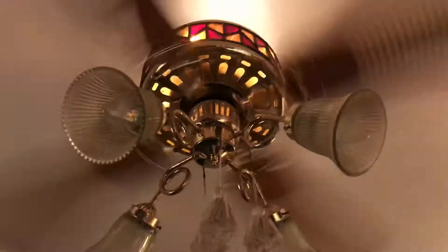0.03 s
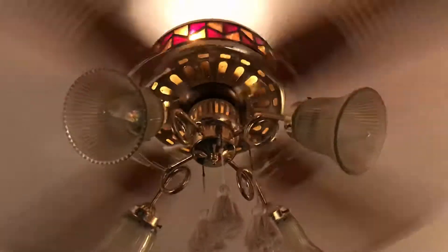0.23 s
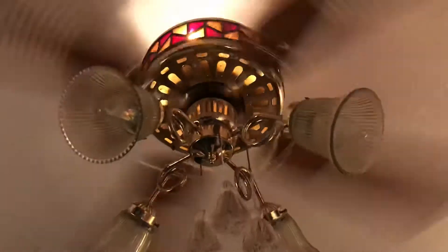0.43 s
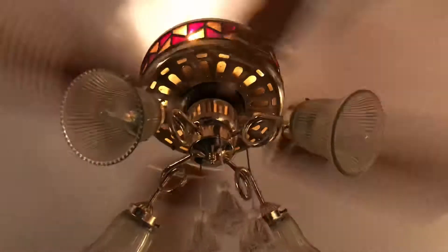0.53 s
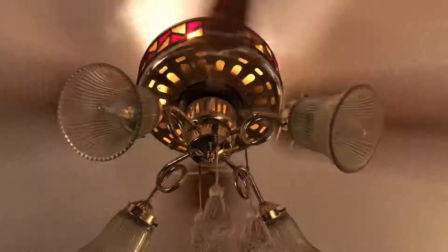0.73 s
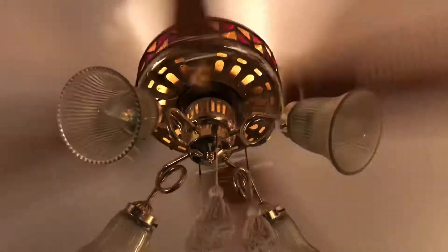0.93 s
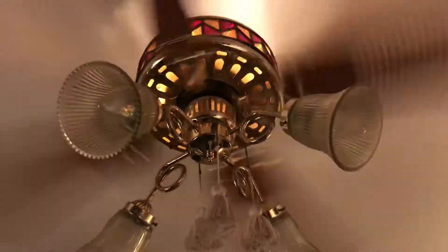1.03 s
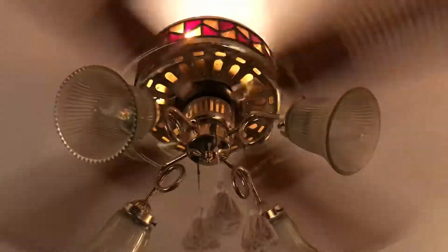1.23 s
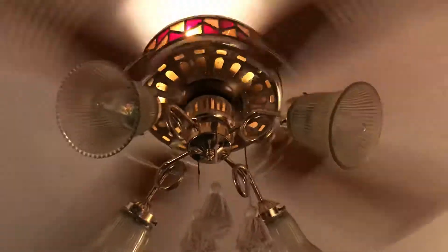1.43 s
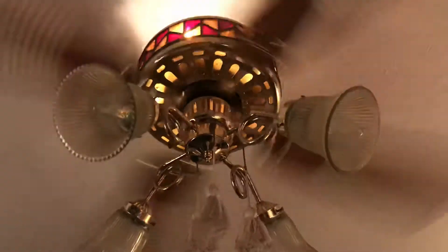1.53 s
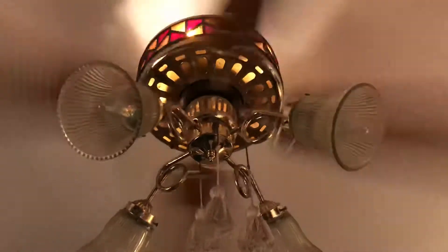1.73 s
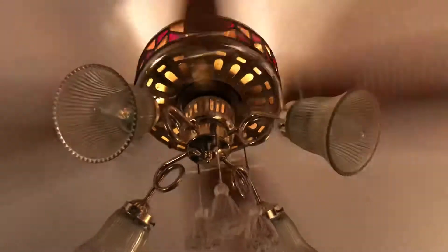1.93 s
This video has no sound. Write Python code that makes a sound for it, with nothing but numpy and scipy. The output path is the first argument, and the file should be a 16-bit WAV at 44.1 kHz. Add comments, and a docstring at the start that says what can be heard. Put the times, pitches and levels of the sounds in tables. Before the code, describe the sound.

A ceiling fan whirs softly with small metallic ticks while air bumps and rumbles on the microphone.

```python
"""Ceiling fan in a quiet room

A low wash of air, swelling slightly with each blade, is shaped noise; the faint motor hum is wavering sines.
Once a turn a small metal tick sounds: a noise crack and decaying sines, with a short room tail.
The housing gives two dull clicks of shaped noise. Puffs of air, hardest near the start, bump softly on the
microphone as single push-pull pulses amid rumbling noise.
Under it all lie a thin noise hiss and a faint electrical whine of steady sines."""
import sys
import numpy as np
from scipy import signal
from scipy.fft import rfft, irfft, next_fast_len
from scipy.io import wavfile
from scipy.ndimage import map_coordinates

SR = 44100
rng = np.random.default_rng(int(sys.argv[2]) if len(sys.argv) > 2 else 0)


def dump_mix(stems):
    """Bounce the given channels to the path in sys.argv[1] as a 16-bit WAV at rate SR."""
    frames = np.atleast_2d(stems).T  # one column per channel
    limited = np.clip(frames, -1, 1)  # hard clip at full scale
    pcm = np.round(limited * 32767).astype(np.int16)
    wavfile.write(sys.argv[1], SR, pcm)


N = 88200  # 2 s


def amp(db):
    """Decibels to gain."""
    return 10 ** (np.asarray(db) / 20)


def unit(x):
    """Scale to rms 1."""
    return x / np.sqrt(np.mean(x ** 2) + 1e-20)


def clock():
    """Time of every sample, in seconds."""
    return np.arange(N) / SR


def filtered(x, response):
    """Shape the spectrum of x by a gain that depends on frequency."""
    size = next_fast_len(N + SR // 2)
    hz = np.fft.rfftfreq(size, 1 / SR)
    return irfft(rfft(x, size) * response(hz), size)[:N]


def noise(colour):
    """Noise of rms 1, its spectrum drawn through (Hz, dB) points on a log-frequency scale."""
    point_hz, point_db = np.transpose(colour)

    def response(hz):
        return amp(np.interp(np.log(hz + 1), np.log(point_hz + 1), point_db))

    return unit(filtered(rng.standard_normal(N), response))


def wobble(rate):
    """A smooth random curve with `rate` knots a second."""
    knots = rng.standard_normal(256)
    return map_coordinates(knots, [clock() * rate], mode="mirror")


def tone(hz, drift=0):
    """A sine of rms 1 at a random phase; drift is an added phase in radians."""
    return np.sqrt(2) * np.sin(2 * np.pi * (hz * clock() + rng.random()) + drift)


BLOW_ATTACK_S = 0.00026  # time constant of the rise


def fade(start, t60):
    """Envelope of a blow: quick rise, then exponential decay by 60 dB in t60 seconds."""
    t = np.maximum(clock() - start, 0)
    rise = 1 - np.exp(-t / BLOW_ATTACK_S)
    return rise * amp(-60 * np.minimum(t / t60, 10))


ROOM_DB, ROOM_T60_S, ROOM_DULL_HZ = -2, 0.26, 7000  # the tail is 6 dB down at ROOM_DULL_HZ


def in_room(x):
    """Add the room's short, duller tail: decaying noise convolved with the sound."""
    t = np.arange(SR // 3) / SR
    tail = rng.standard_normal(len(t)) * amp(-60 * t / ROOM_T60_S)
    wet = signal.fftconvolve(x, tail / np.linalg.norm(tail))[:N]
    return x + amp(ROOM_DB) * filtered(wet, lambda hz: 1 / (1 + (hz / ROOM_DULL_HZ) ** 2))


# spectrum of the microphone hiss: frequency_hz, relative_level_db
HISS_COLOUR = [(300, 5.5), (2000, -0.5), (3500, -0.5), (5000, -4.5), (6800, -5), (7600, -9), (8800, -6),
               (10400, -12), (11500, -8.5), (13000, -9.5), (15700, -12)]
HISS_DB = -72.5


def hiss():
    """Microphone hiss: steady shaped noise."""
    return amp(HISS_DB) * noise(HISS_COLOUR)


# harmonics of the electrical whine: multiple (of the base pitch), level_db (rms)
WHINE_HARMONICS = [(3, -95), (4, -94.5), (5, -102), (6, -95), (7, -98), (8, -99), (9, -101), (10, -101),
                   (12, -100)]
WHINE_HZ = 999.2


def whine():
    """Electrical whine: a faint comb of steady sines at multiples of one pitch."""
    return sum(amp(db) * tone(round(multiple) * WHINE_HZ) for multiple, db in WHINE_HARMONICS)


# puffs of air on the microphone: middle_s, level_db (peak before the port filter), centre_hz
AIR_PUFFS = [(0.168, -28, 135), (0.1829, -28.5, 135), (0.2141, -25.5, 260), (0.2175, -15.5, 132),
             (0.2233, -29.5, 105), (0.2309, -21.5, 119), (0.240, -26.5, 138), (0.274, -33, 220),
             (0.2862, -23.5, 137), (0.359, -34.5, 144), (0.536, -46.5, 89), (0.9673, -32.5, 114),
             (1.2328, -31, 121), (1.243, -35, 103), (1.279, -32, 129), (1.291, -30.5, 62.4)]
PORT_LOW_HZ = 66


def puffs():
    """Each puff pushes and pulls once on the microphone port, which thins out the lows."""
    pressure = np.zeros(N)
    for middle, db, hz in AIR_PUFFS:
        u = 2 * np.pi * hz * (clock() - middle)
        # slope of a Gaussian bump, scaled to peak at 1
        pressure -= amp(db) * u * np.exp((1 - u * u) / 2)
    port = signal.butter(N=3, Wn=PORT_LOW_HZ, btype="highpass", fs=SR, output="sos")
    return signal.sosfilt(port, pressure)


# level of the eddies at the microphone: time_s, level_db
EDDY_LEVEL = [(0, -77), (0.1, -50.5), (0.17, -35), (0.24, -32), (0.31, -49), (0.365, -46.5), (0.43, -75),
              (0.541, -46), (0.59, -57.5), (0.91, -55.5), (0.97, -41.5), (1.04, -50.5), (1.18, -56),
              (1.28, -45), (1.35, -55), (1.46, -55.5), (1.51, -50), (1.61, -63.5), (1.82, -44), (1.88, -57),
              (1.94, -49), (2, -56.5)]
# spectrum of the eddies: frequency_hz, relative_level_db
EDDY_SPECTRUM = [(15, -44), (28, -22), (45, 8), (70, 2.5), (150, -5.5), (250, -11), (400, -25.5),
                 (700, -41), (1500, -73)]


def eddies():
    """Turbulence at the microphone: a low rumble of shaped noise that surges and sinks."""
    level_db = np.interp(clock(), *np.transpose(EDDY_LEVEL))
    return amp(level_db) * noise(EDDY_SPECTRUM)


# dull little clicks of the housing: start_s, level_db
HOUSING_CLICKS = [(0.6486, -56), (1.234, -60)]
# spectrum of a click: frequency_hz, relative_level_db
CLICK_SPECTRUM = [(500, -21), (900, -8), (1250, -0.5), (1600, -4.5), (2300, -18), (5300, -19), (7000, -26),
                  (15000, -24)]
CLICK_T60_S = 0.024


def clicks():
    """The housing gives a dull click now and then: a short burst of shaped noise in the room."""
    envelope = sum(amp(db) * fade(start, CLICK_T60_S) for start, db in HOUSING_CLICKS)
    return in_room(noise(CLICK_SPECTRUM) * envelope)


# the tick of each turn: start_s, level_db
TURN_TICKS = [(0.0724, -68.5), (0.327, -65.5), (0.7092, -64), (1.0798, -61), (1.445, -59.5),
              (1.8050, -63.5)]
# ringing modes of the loose metal fitting: pitch_hz, relative_level_db, t60_s
FITTING_MODES = [(1827, -3, 0.14), (2545, -7.5, 0.075), (2690, -6, 0.086), (3490, -9.5, 0.035),
                 (4220, -13.5, .04), (4984, -6, .04), (6050, -4.5, 0.073), (6600, -18, .035),
                 (7090, -1.5, 0.029), (8480, -10.5, 0.024), (8300, -7, .022), (9530, -8, 0.044),
                 (11320, -2, 0.026)]
CRACK_DB, CRACK_T60_S = 1.5, 0.021  # level relative to the tick


def ticks():
    """Once a turn a loose fitting is knocked: a tiny noise crack and its ringing modes."""
    out = np.zeros(N)
    for start, db in TURN_TICKS:
        ring = np.zeros(N)
        for hz, mode_db, t60 in FITTING_MODES:
            strength_db = mode_db + rng.normal(0, 1)  # each knock excites the modes a little differently
            ring += amp(strength_db) * tone(hz) * fade(start, t60)
        crack = amp(CRACK_DB) * rng.standard_normal(N) * fade(start, CRACK_T60_S)
        out += amp(db) * in_room((ring + crack) / 2)
    return out


# motor and housing tones: pitch_hz, level_db
HUM_TONES = [(148, -66), (237, -66.5), (286, -71.5), (362, -63), (980, -89)]
HUM_WAVER, HUM_WAVER_RATE = 0.21, 8.38  # share of the level, knots a second
HUM_DRIFT_RAD, HUM_DRIFT_RATE = 0.58, 10  # phase depth, knots a second


def hum():
    """Motor hum: sines that waver independently in level and phase."""
    out = np.zeros(N)
    for hz, db in HUM_TONES:
        waver = 1 + HUM_WAVER * wobble(HUM_WAVER_RATE)
        drift = HUM_DRIFT_RAD * wobble(HUM_DRIFT_RATE)
        out += amp(db) * waver * tone(hz, drift)
    return out


# spectrum of the air stirred by the blades: frequency_hz, relative_level_db
WASH_COLOUR = [(20, -18.5), (45, -4), (100, -7.5), (180, -0.5), (240, 4.5), (360, -0.5), (440, -5),
               (520, -10.5), (700, -19.5), (900, -17), (1250, -24.5), (2000, -30.5), (4000, -50)]
WASH_DB, SWELL_DB, BLADE_HZ = -52, 1.17, 16  # mean level, rms swell, blade passes a second


def wash():
    """Air stirred by the fan: shaped noise that swells slightly with each passing blade."""
    level_db = WASH_DB + SWELL_DB * tone(BLADE_HZ)
    return amp(level_db) * noise(WASH_COLOUR)


def scene():
    """Everything at one microphone below the fan."""
    electronics = hiss() + whine()
    draught = puffs() + eddies()
    fan = clicks() + ticks() + hum() + wash()
    return (electronics + draught + fan)[None]


TOP_HZ = 15780


def record(dry):
    """Nothing is kept above the band limit."""
    return filtered(dry[0], lambda hz: hz < TOP_HZ)[None]


dry = scene()
out = record(dry)
dump_mix(out)
```